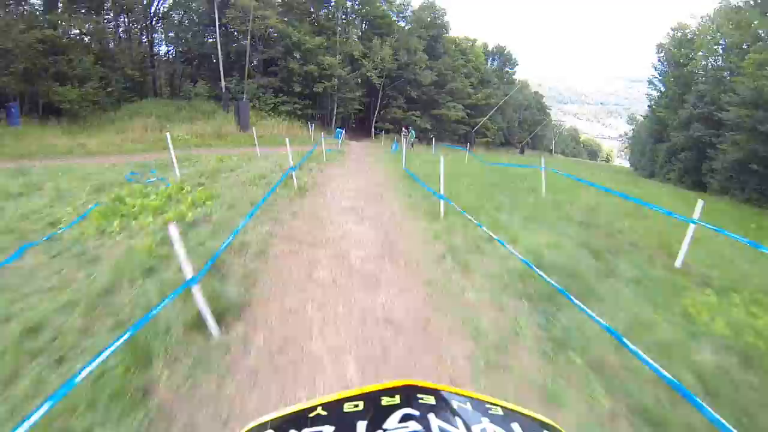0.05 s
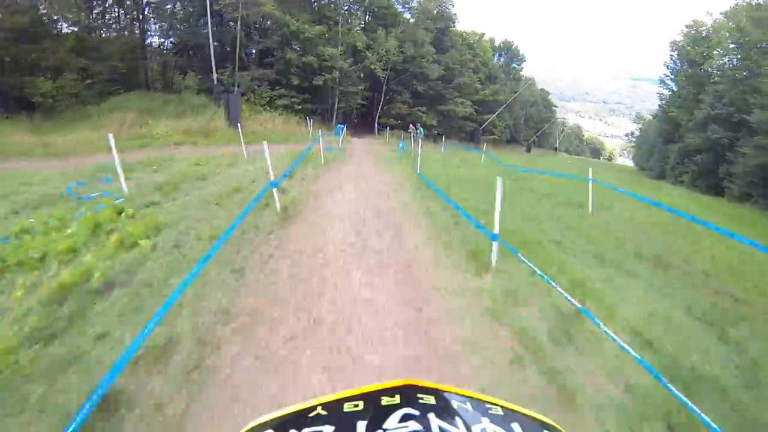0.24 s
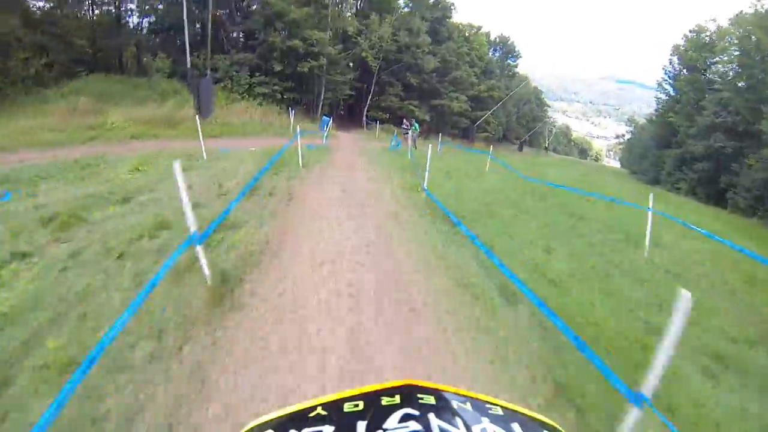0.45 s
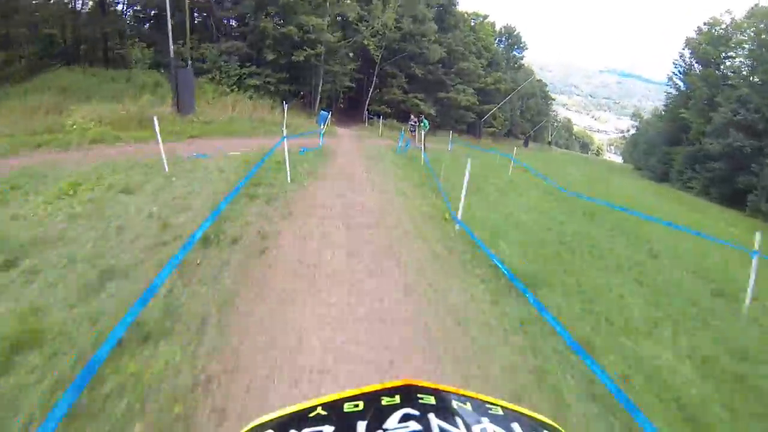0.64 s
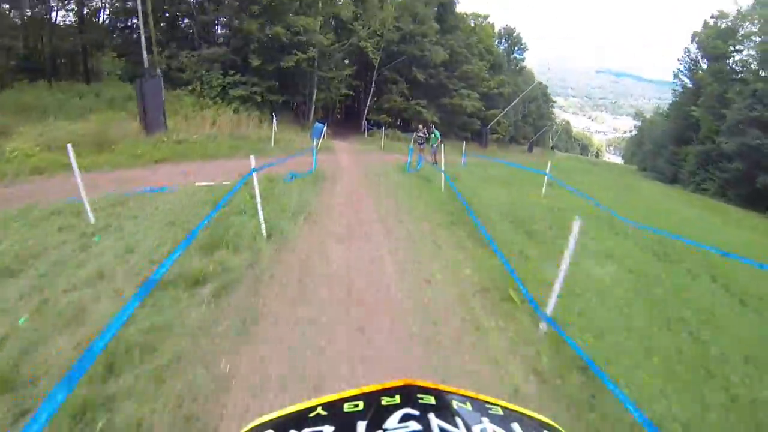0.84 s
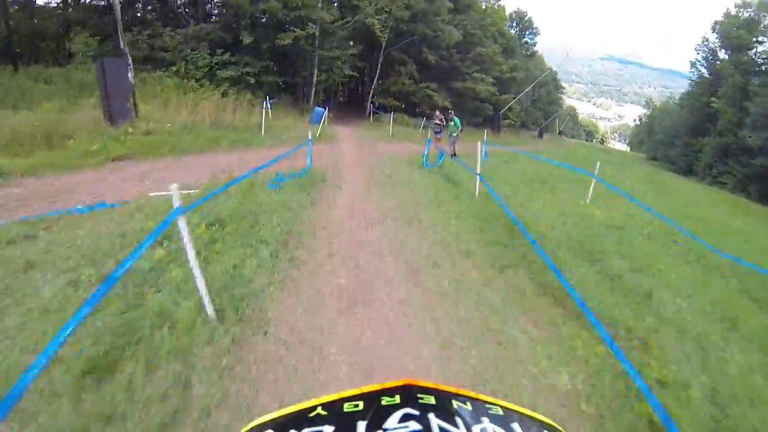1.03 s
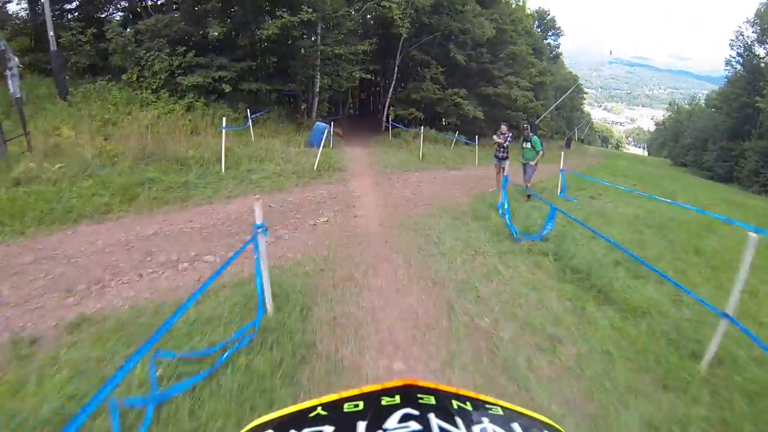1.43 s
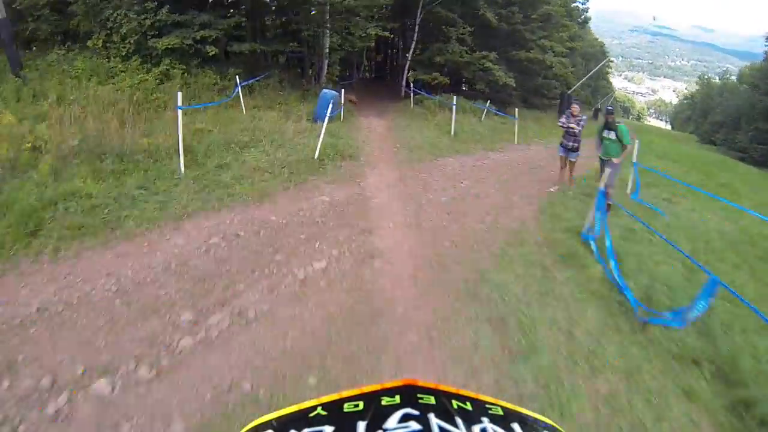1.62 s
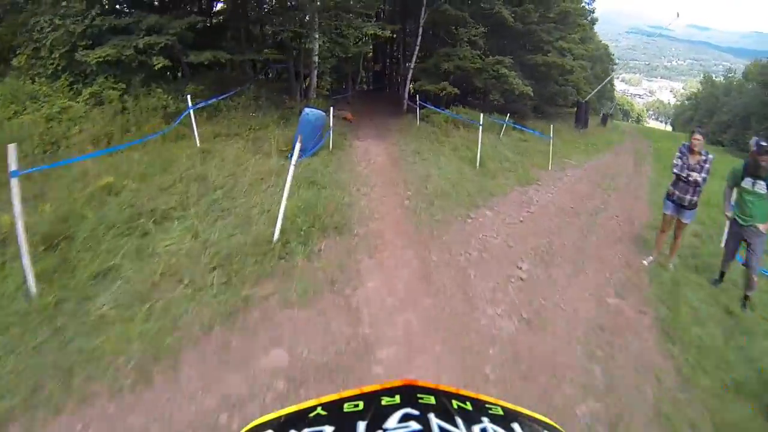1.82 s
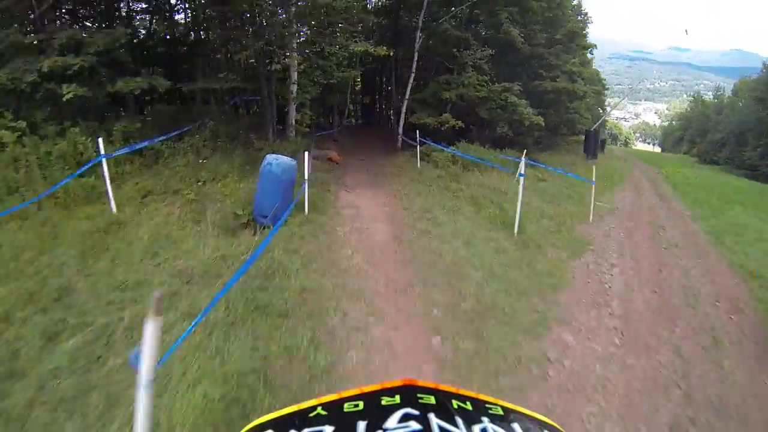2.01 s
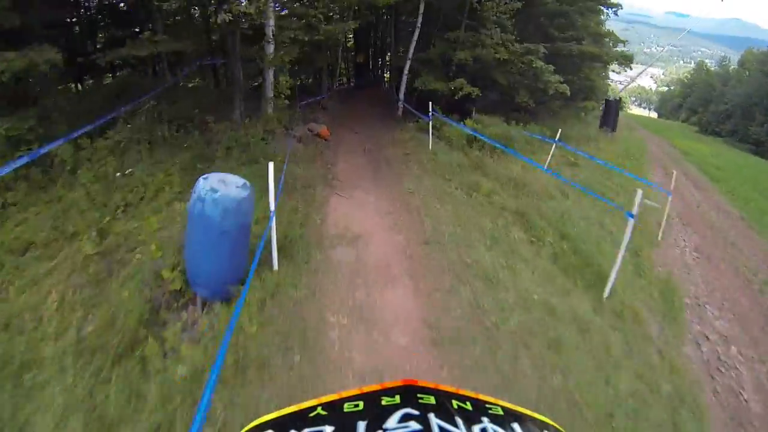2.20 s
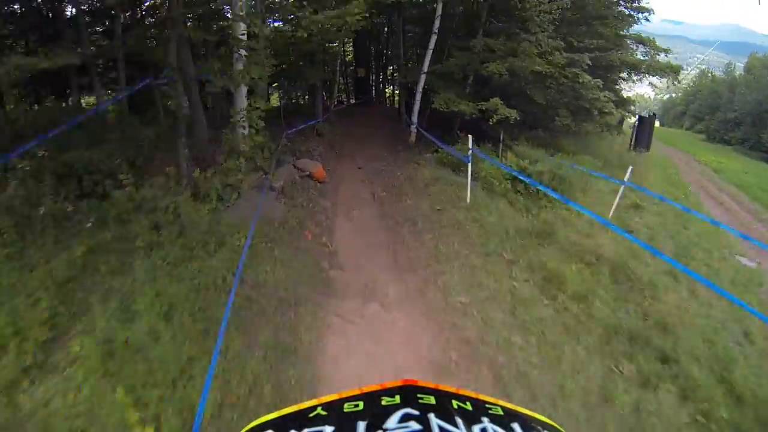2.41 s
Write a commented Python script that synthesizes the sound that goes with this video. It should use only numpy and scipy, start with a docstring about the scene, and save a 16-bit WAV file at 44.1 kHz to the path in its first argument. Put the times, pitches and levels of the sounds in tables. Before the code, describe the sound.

Wind rushes over a helmet microphone throughout, hissing with a breathy, wavering whistle and deep buffeting thumps. Bicycle tyres rumble on dirt below, knocking dully near 0.3 and 0.7 seconds. The rush swells from 1 second; the strongest gust lands with two more bumps around 1.3, and the whistle flares at 1.5. The wind eases, then surges near 2 and 2.5 seconds. A very faint electronic whine runs underneath.

```python
"""A fast bicycle ride down a dirt track, heard from a camera on the rider's helmet.
From the start, air hisses over the helmet and rings a hollow of the camera housing, while the
tyres rumble below and knock over a few bumps. Eddies buffet the microphone with deep thumps.
About a second in, the rush swells; the strongest gust lands with two more bumps and the ring flares.
The wind then eases and surges again to the end. A faint electronic whine runs underneath."""
import sys
import numpy as np
from scipy import signal
from scipy.fft import rfft, irfft
from scipy.io import wavfile
from scipy.ndimage import uniform_filter1d

SR = 44100
rng = np.random.default_rng(int(sys.argv[2]) if len(sys.argv) > 2 else 0)


def store_pcm(level_fs):
    """Save levels as 16-bit WAV."""
    pcm = np.round(np.clip(level_fs, -1, 1) * 32767).astype(np.int16)
    wavfile.write(sys.argv[1], SR, np.atleast_2d(pcm).T)


N = 112454

# airflow over the helmet: t/s, housing ring level/dB, relative hiss level/dB
AIRFLOW = [(0, -41, -50), (.1, -39, -51.5), (.25, -34.5, -49), (.44, -34, -48.5), (.52, -36.5, -50.5),
           (.73, -35, -47.5), (.84, -36, -52), (.97, -31, -45.5), (1.28, -27.5, -41.5), (1.42, -28, -40.5),
           (1.47, -22.5, -40.5), (1.52, -29, -41), (1.64, -31, -43.5), (1.73, -33.5, -47.5),
           (1.95, -28.5, -44.5), (2.09, -31.5, -42.5), (2.27, -35, -49), (2.42, -30, -44), (2.55, -29, -44)]


def undb(db):
    """Decibels to gain."""
    return 10 ** (np.asarray(db) / 20)


def unit(x):
    """Scale to rms 1."""
    return x / np.sqrt(np.mean(x ** 2))


def envelope(table, column=1):
    """Gain over time from one dB column of a table."""
    rows = np.array(table, float)
    return undb(np.interp(np.arange(N) / SR, rows[:, 0], rows[:, column]))


def noise(colour):
    """Noise at rms 1, coloured by rows of f/Hz, level/dB."""
    hz, db = np.array(colour, float).T
    f = np.maximum(np.arange(N // 2 + 1) * SR / N, 1)
    gain = undb(np.interp(np.log(f), np.log(hz), db))
    return unit(irfft(rfft(rng.standard_normal(N)) * gain, N))


def resonance(hz, width_hz):
    """Noise ringing a steep-sided resonance: two band-passes in series, each width_hz wide."""
    b, a = signal.iirpeak(hz, hz / width_hz, fs=SR)
    return unit(signal.lfilter(b, a, signal.lfilter(b, a, rng.standard_normal(N))))


def ring(modes):
    """A set of resonances, each stirred by its own eddies."""
    return unit(sum(undb(db) * resonance(hz, width) for hz, width, db in modes))


def wander(rate_hz):
    """Smooth random movement, mostly slower than rate_hz, at rms 1."""
    f = np.arange(N // 2 + 1) * SR / N
    return unit(irfft(rfft(rng.standard_normal(N)) / (1 + (f / rate_hz) ** 2), N))


def camera_whine():
    """Faint steady tones of the camera's electronics."""
    tones = [(10645, -82), (13187, -90)]  # thin whine: f/Hz, level/dB
    t = np.arange(N) / SR
    return sum(undb(db) * np.sin(2 * np.pi * hz * t) for hz, db in tones)


def tyres():
    """Knobbly tyres drone and roar on the dirt; each bump gives a dull knock."""
    rolling = [(0, -51.5, -40), (.25, -46.5, -35.5), (.55, -46, -39.5), (.72, -42.5, -38.5),
               (.84, -48, -37.5), (1.08, -40, -36.5), (1.25, -39.5, -27.5), (1.5, -40, -33),
               (1.78, -38.5, -37), (2.0, -40.5, -36.5), (2.25, -39.5, -29), (2.38, -38, -31),
               (2.45, -43.5, -31), (2.55, -36, -31.5)]  # tyres on dirt: t/s, roar level/dB, relative drone level/dB
    roar_colour = [(70, -13.5), (140, -0.5), (200, 0.5), (260, -3), (320, -2), (372, 2.5), (410, -4),
                   (470, -5.5), (550, -14), (720, -12), (900, -13), (1400, -8), (3000, -61)]  # spectrum of roar and knocks: f/Hz, relative level/dB
    bumps = [(.243, -39), (0.318, -34.5), (0.739, -39), (1.248, -32.5), (1.328, -32)]  # knocks under the wheels: t/s, level/dB
    attack_s, decay_s = .004, .012
    t = np.arange(N) / SR
    roar = noise(roar_colour) * envelope(rolling, column=1)
    drone = undb(-1) * resonance(hz=98.4, width_hz=42) * envelope(rolling, column=2)
    knock_gain = np.zeros(N)
    for at, db in bumps:
        attack = np.clip((t - at) / attack_s + 1, 0, 1)
        decay = np.exp(-np.maximum(t - at, 0) / decay_s)
        knock_gain += undb(db) * attack * decay
    return roar + drone + knock_gain * noise(roar_colour)


def buffeting():
    """Small eddies rumble on the microphone in deep gusts."""
    eddy_colour = [(6, -25.5), (13, -4.5), (20, -2.5), (30, -11.5), (42, -12.5), (55, -29), (80, -25),
                   (140, -44), (300, -73), (900, -100)]  # spectrum of the pressure swings: f/Hz, relative level/dB
    gusts = [(0, -23), (.12, -31), (.27, -22), (.36, -23.5), (.47, -23), (.7, -20.5), (.93, -17),
             (1.08, -16), (1.18, -24), (1.275, -9.5), (1.37, -18), (1.66, -11.5), (1.76, -19),
             (1.86, -21.5), (2.0, -16), (2.22, -10.5), (2.33, -25.5), (2.55, -33)]  # turbulence at the microphone: t/s, level/dB
    evenness, window = 0.49, SR // 25
    swings = signal.hilbert(noise(eddy_colour))
    power = uniform_filter1d(uniform_filter1d(np.abs(swings) ** 2, window), window)
    rumble = unit(swings.real / power ** (evenness / 2))  # partly levels out the random swells
    return rumble * envelope(gusts)


def thumps():
    """Each large eddy passes the microphone as a brief suction between two pushes."""
    large_eddies = [(0.32, 0.011, -12), (0.385, 0.015, -10.5), (0.761, 0.012, -0.5), (0.846, 0.017, -3.5),
                    (1.246, .011, -3.5), (1.316, 0.0096, -8), (1.622, 0.013, -7.5), (1.704, 0.011, -3),
                    (2.132, 0.02, -2.5), (2.229, 0.0057, -15)]  # pressure pulses: t/s, half length/s, peak level/dB
    t = np.arange(N) / SR
    pressure = np.zeros(N)
    for at, half_s, db in large_eddies:
        u = ((t - at) / half_s) ** 2
        pressure += undb(db) * (2 * u - 1) * np.exp(-u)
    return pressure


def housing_ring(flutter):
    """Passing air rings a hollow of the camera housing, a breathy, wavering whistle."""
    modes = [(1349.4, 150, 0), (1505, 278, 2)]  # the hollow's resonances: f/Hz, filter width/Hz, relative level/dB
    flutter_db = 1.5
    return unit(ring(modes) * undb(flutter_db * flutter)) * envelope(AIRFLOW, column=1)


def air_rush(flutter):
    """Air hisses over the helmet and stirs the housing's overtones, with a fine sizzle on top."""
    hiss_colour = [(500, -8), (700, 0), (900, -2.5), (1150, 5), (1900, -0.5), (2400, -2), (2900, -8),
                   (3600, -9.5), (4000, -15), (4250, -11.5), (4500, -19.5), (5200, -15.5), (6000, -18),
                   (6600, -25.5), (8000, -40), (12000, -67)]  # spectrum of the rushing air: f/Hz, relative level/dB
    overtones = [(2194, 480, 0), (3440, 560, -1), (4920, 250, -9.5), (5670, 1000, -23.5)]  # upper housing resonances: f/Hz, filter width/Hz, relative level/dB
    sizzle_colour = [(4500, -23), (6200, 0), (7000, 0.5), (7600, 1.5), (8500, -3.5), (9300, -3.5),
                     (10300, -7.5), (10900, -3.5), (11300, -8.5), (12000, -17), (12800, -18), (13600, -18),
                     (15000, -22)]  # spectrum of the top treble: f/Hz, relative level/dB
    sizzle_swells = [(0, -66), (.17, -69), (.25, -65), (.29, -70), (.35, -65), (.45, -64.5), (.58, -68),
                     (.7, -64), (.85, -70), (1.03, -58.5), (1.09, -64.5), (1.28, -59), (1.47, -57),
                     (1.54, -59.5), (1.62, -57.5), (1.7, -65.5), (2.07, -59), (2.26, -65), (2.55, -58.5)]  # rise and fall of the top treble: t/s, relative level/dB
    flutter_db = 0.68
    hiss = undb(7.5) * noise(hiss_colour) + undb(-1) * ring(overtones)
    sizzle = undb(-2) * noise(sizzle_colour) * envelope(sizzle_swells)
    return (hiss * envelope(AIRFLOW, column=2) + sizzle) * undb(flutter_db * flutter)


def scene():
    """Wind, tyres and whine at one microphone; the ring and the rush flutter together."""
    flutter = wander(rate_hz=44)
    wind = housing_ring(flutter) + air_rush(flutter) + buffeting() + thumps()
    return (wind + tyres() + camera_whine())[None]


def record(dry):
    """The sound opens without a click; the camera cuts the top."""
    fade_s, cutoff_hz = .002, 15200
    fade_in = np.clip(np.arange(N) / SR / fade_s, 0, 1)
    lowpass = signal.ellip(8, .1, 80, cutoff_hz, fs=SR, output="sos")
    return signal.sosfilt(lowpass, dry * fade_in)


dry = scene()
out = record(dry)
store_pcm(out)
```